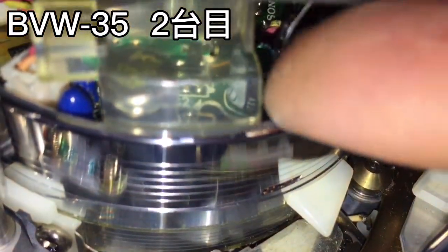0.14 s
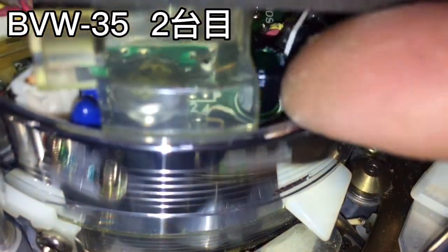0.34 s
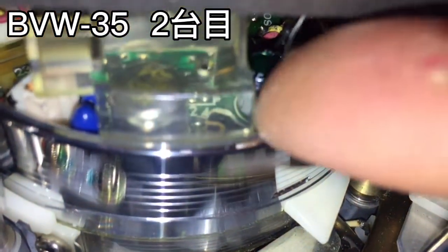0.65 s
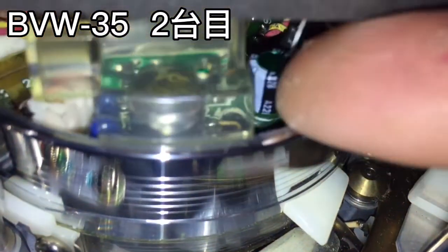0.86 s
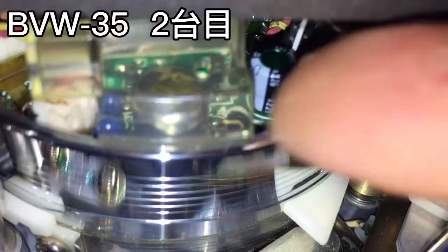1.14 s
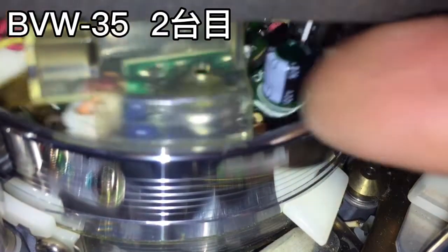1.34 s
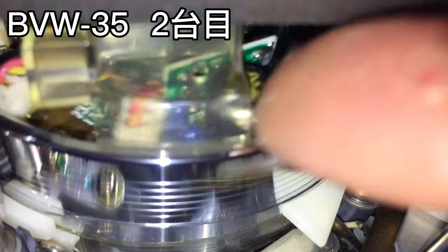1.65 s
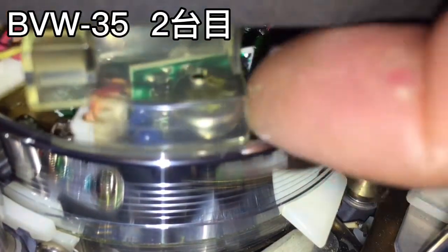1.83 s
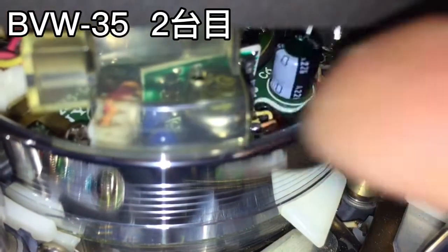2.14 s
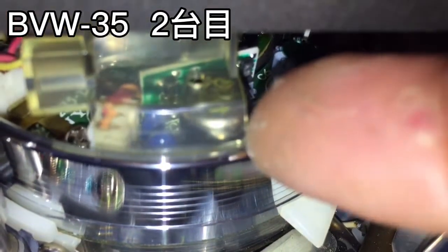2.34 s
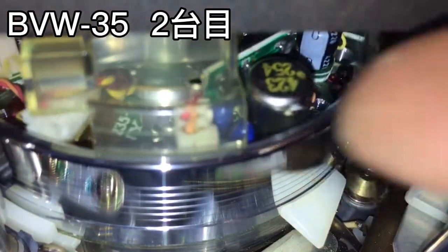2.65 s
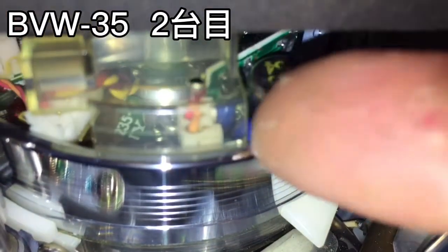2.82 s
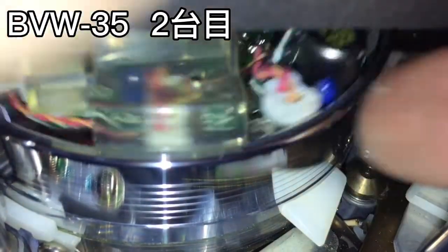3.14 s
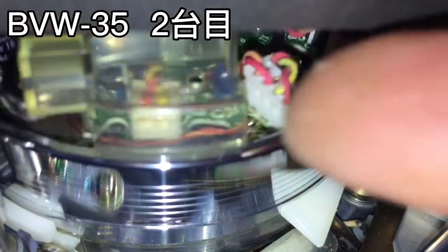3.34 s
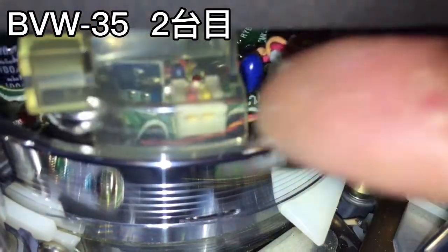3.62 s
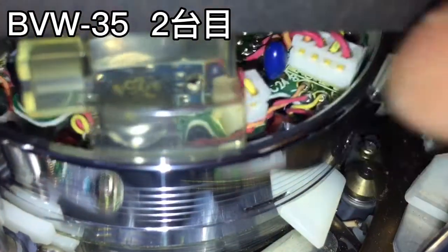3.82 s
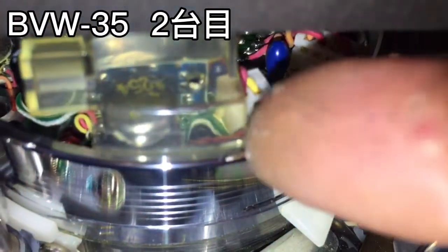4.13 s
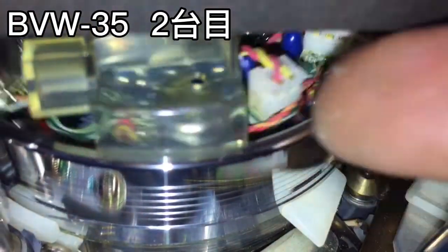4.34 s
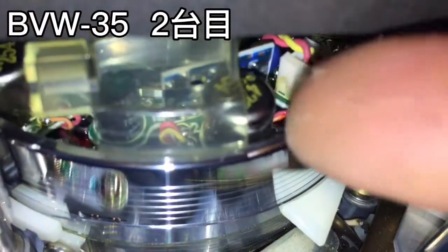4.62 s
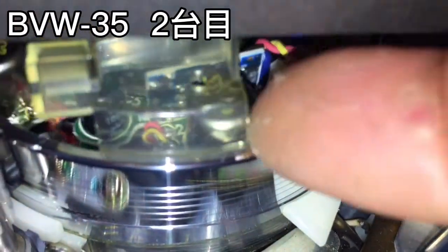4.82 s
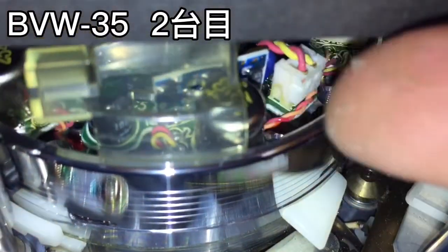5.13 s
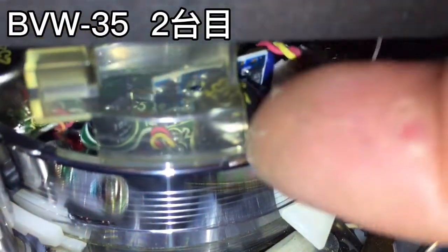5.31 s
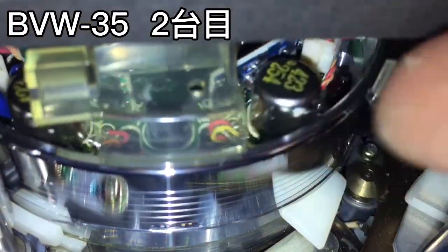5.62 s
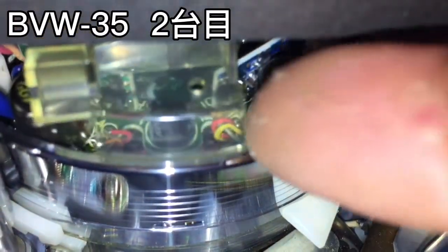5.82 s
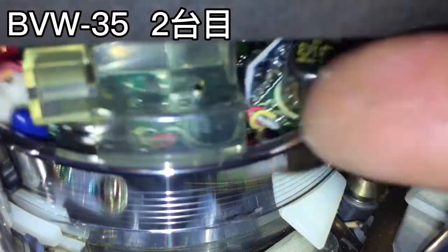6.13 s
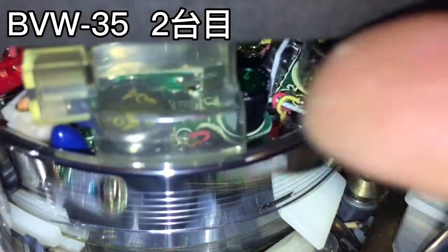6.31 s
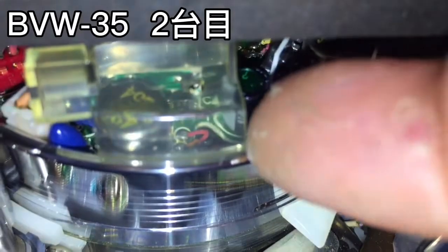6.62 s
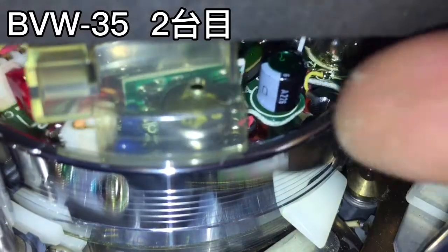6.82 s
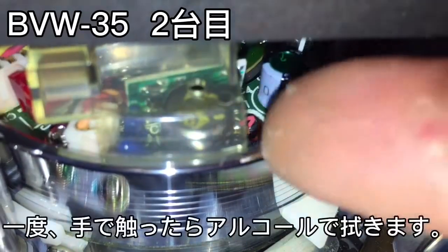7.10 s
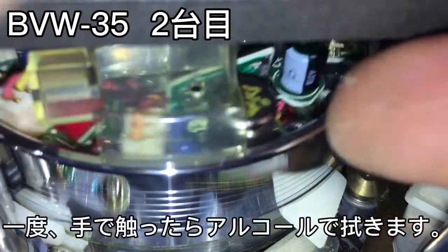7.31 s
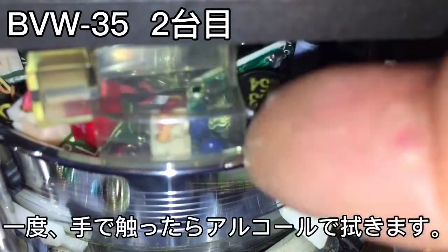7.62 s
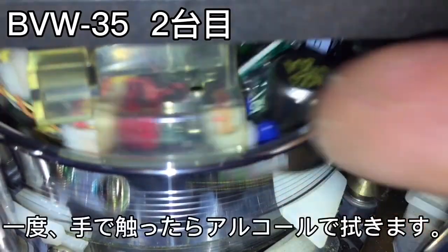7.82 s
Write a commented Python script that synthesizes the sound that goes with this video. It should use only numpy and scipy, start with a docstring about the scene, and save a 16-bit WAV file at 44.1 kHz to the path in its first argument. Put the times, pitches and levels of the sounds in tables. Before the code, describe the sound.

Very close to the microphone, a fingertip nudges a metal drum inside an opened machine. Faint rubs and light ticks come first, then soft low thuds and short singing slides that snap off in sharp, gritty clicks about every 0.6 to 1.1 seconds. Three hollow knocks, sagging in pitch, follow clicks around the middle. A low, slightly wavering hum stays underneath in a quiet, nearly dry workshop.

```python
"""Faint singing rubs end in sharp clicks, again and again, with soft thuds, three hollow knocks and a low hum.
A fingertip nudges the metal head drum of an opened tape machine round, close to the microphone.
Uneven skin friction drives the drum's resonances; slipping off, the finger rings the rim and sprays grit.
Pushes of the pad sway the chassis and its panels; the knocks are dying tones that sag in pitch.
A reflection and a short tail place the finger in a quiet workshop of filtered noise and mains hum."""
import sys
import numpy as np
from scipy import signal
from scipy.io import wavfile

SR = 44100
rng = np.random.default_rng(int(sys.argv[2]) if len(sys.argv) > 2 else 0)


def persist_wave(psi):
    """Save psi, clipped to +-1, as 16-bit WAV."""
    counts = np.round(np.clip(psi, -1, 1) * 32767).astype(np.int16)
    wavfile.write(sys.argv[1], SR, np.atleast_2d(counts).T)


N = 351036

# The finger takes hold, slides the drum round and slips off the rim:
# (slip time [s], slide length [s], click level [dB], pressure level [dB], fizz level [dB])
FLICK_EVENTS = [(1.508, 0.11, -19.5, -54.5, -62.5), (2.602, 0.077, -23.5, -60.5, -57),
                (3.22, 0.096, -27.5, -61, -60), (3.804, 0.076, -29, -58, -58.5),
                (4.493, 0.095, -26, -62.5, -86), (5.644, 0.071, -20.5, -59.5, -67),
                (6.276, 0.086, -27.5, -63, -75), (6.906, 0.063, -27, -73, -91),
                (7.439, 0.11, -23, -66, -75)]
# Resonances of the fine skin ridges: (frequency [Hz], width [Hz], level [dB])
RIDGE_MODES = [(5630, 290, -2), (9330, 320, 12), (9144, 68, 17), (12640, 340, -9.5), (14370, 190, 7.5)]
GRIP_S = 0.055  # the pad takes hold this long before it slides
TREBLE_HZ = 12300  # skin noise fades above this


def amp(db):
    """Turns decibels into an amplitude factor."""
    return 10 ** (np.asarray(db) / 20)


def unit(x):
    """Scales to rms 1."""
    return x / np.sqrt(np.mean(x ** 2) + 1e-20)


def read(points, hz):
    """Joins (Hz, value) points on a log-frequency axis."""
    f, value = np.transpose(points)
    return np.interp(np.log(hz + 1), np.log(f + 1), value)


def add(mix, s, sound):
    """Mixes a sound in at time s."""
    part = mix[round(s * SR):][:len(sound)]
    part += sound[:len(part)]


def wander(count, per_s):
    """A random drift: straight lines between per_s normal draws a second."""
    place = np.arange(count) * per_s / SR
    return np.interp(place, np.arange(4096), rng.standard_normal(4096))


def dull(x, hz):
    """A gentle low-pass."""
    return signal.sosfilt(signal.butter(2, hz, fs=SR, output="sos"), x)


def colour(x, points, size=4096):
    """Causal filter of energy 1 whose spectrum has the shape of the (Hz, dB) points."""
    log_gain = np.log(amp(read(points, abs(np.fft.fftfreq(size, 1 / SR)))))
    # the Hilbert transform gives the phase that makes the filter causal
    taps = np.fft.ifft(np.exp(np.conj(signal.hilbert(log_gain)))).real
    return signal.oaconvolve(x, taps / np.linalg.norm(taps))[:len(x)]


def resonate(x, modes, bend=1):
    """Resonances (Hz, width, dB), all moved by the factor bend; white noise keeps its power."""
    out, power = 0, 0
    for k, (hz, width, db) in enumerate(modes):
        # shift the mode down to 0 Hz, smooth there, and shift back
        turn = np.exp(2j * np.pi * np.cumsum(hz * bend * np.ones(len(x))) / SR)
        r = np.exp(-np.pi * width / SR)
        band = (turn * signal.lfilter([1 - r], [1, -r], x / turn)).real
        out = out + (-1) ** k * amp(db) * band
        power += amp(db) ** 2 * (1 - r) / (1 + r) / 2
    return out / np.sqrt(power)


def ring(t, hz, t60):
    """One dying mode: a sine that loses 60 dB in t60 seconds."""
    return np.sin(2 * np.pi * hz * t) * amp(-60 * t / t60)


def friction(count, flutter_db=4.0, flutter_per_s=160, slips_per_s=900, slip_share=0.36):
    """Skin grips unevenly: hiss and tiny slips under a fluttering pressure."""
    slips = rng.standard_normal(count) * (rng.random(count) < slips_per_s / SR)
    rough = rng.standard_normal(count) + slip_share * unit(slips)
    return unit(rough * amp(flutter_db * wander(count, flutter_per_s)))


def panels(x, top_hz=900):
    """The chassis passes mainly its low panel resonances."""
    # Chassis panel resonances: (frequency [Hz], width [Hz], level [dB])
    panel_modes = [(202.6, 53, -6), (281.6, 10, 2.5), (338.9, 22.2, 5.5), (365.4, 67, 0.5), (544, 26.3, -5),
                   (653, 124, -10)]
    return dull(resonate(x, panel_modes), top_hz)


def workshop(air_db=-60, waver_db=2.4):
    """Steady shaped room noise under a low, wavering hum of a distant motor and the mains."""
    # Spectrum of the room noise: (frequency [Hz], relative level [dB])
    air_spectrum = [(25, -15), (50, 2), (85, -8), (112, 4), (150, -13), (250, -19), (700, -28.5),
                    (2000, -30.5), (15500, -42.5)]
    # Hum tones of a distant motor and the mains: (frequency [Hz], rms level before the waver [dB])
    hum_tones = [(47.6, -64), (100, -56.5)]
    t = np.arange(N) / SR
    hum = 0
    for hz, db in hum_tones:
        hum = hum + amp(db) * np.sqrt(2) * np.sin(2 * np.pi * (hz * t + rng.random()))
    air = amp(air_db) * colour(rng.standard_normal(N), air_spectrum)
    return air + hum * amp(waver_db * wander(N, 11))


def room(x, echo_s=0.0095, echo_db=-13, echo_hz=2200, wet_db=-18):
    """A dull reflection from the bench and a short tail that dies faster in the treble than in the bass."""
    # Decay of the tail: (frequency [Hz], t60 [s])
    decay_times = [(100, 0.29), (1000, 0.1), (14000, 0.11)]
    count = SR // 2
    taps = rng.standard_normal(count) * (np.arange(count) > SR // 250)  # silent for the first 4 ms
    hz, t, z = signal.stft(taps, SR, nperseg=256)
    decay = amp(-60 * t / read(decay_times, hz)[:, None])
    tail = signal.istft(z * decay, SR, nperseg=256)[1]
    out = x + amp(wet_db) * signal.fftconvolve(x, tail / np.linalg.norm(tail))[:N]
    add(out, echo_s, amp(echo_db) * dull(x, echo_hz))
    return out


def knocks(sag=0.29, sag_s=0.0023, push_hz=95, push_t60=0.016, push_delay_s=0.0037,
           tick_t60=0.0078, tick_hz=2800, lead_db=-22, lead_s=0.0046,
           after_db=-28, after_t60=0.046, linger_db=-46, linger_t60=0.31):
    """A sagging hollow tone, a few milliseconds of noise rising into it, a dull tick and a low push."""
    # Hollow knocks: (time [s], tone level [dB], nominal pitch [Hz], tone t60 [s],
    # tick level [dB], low push level before its rise and doubling [dB])
    knock_events = [(2.678, -29.5, 873, 0.037, -63, -21), (3.2776, -18, 847, 0.019, -33.5, -16),
                    (3.8513, -22, 838, 0.023, -39.5, -50)]
    out, t = np.zeros(N), np.arange(SR // 8) / SR
    bent = t + sag * sag_s * (1 - np.exp(-t / sag_s))  # time runs fast at first, so the pitch sags
    for s, db, hz, t60, tick_db, push_db in knock_events:
        tick, noise = rng.standard_normal((2, len(t)))
        tone = ring(bent, hz * (1 - sag / 2), t60)
        hollow = dull(resonate(noise, [(hz, 200, 0), (2200, 500, -14)]), tick_hz)
        fade = amp(after_db - 60 * t / after_t60) + amp(linger_db - 60 * t / linger_t60)
        add(out, s, amp(db) * (tone + hollow * fade))
        add(out, s, amp(tick_db) * unit(dull(tick, tick_hz)) * amp(-60 * t / tick_t60))
        # noise rises into the knock
        add(out, s - t[-1], amp(db + lead_db) * hollow * np.exp((t - t[-1]) / lead_s))
        push = ring(t, push_hz, push_t60) * (1 - np.exp(-t / push_delay_s))
        add(out, s + push_delay_s, -2 * amp(push_db) * push)
    return out


def pushes(grip_db=-52, grip_panel_db=-50.5):
    """Every push of the pad, the thuds and the faint grip that opens each flick: (s, sway, panel)."""
    # The soft pad meets the drum and shakes the chassis:
    # (time [s], sway level before trim [dB], panel level before trim [dB])
    thud_events = [(1.002, -37, -55), (1.234, -38.5, -42), (1.734, -34.5, -37.5), (1.84, -40.5, -52),
                   (2.076, -33, -26), (2.282, -35.5, -43.5), (2.797, -35.5, -42), (3.521, -36.5, -52.5),
                   (4.14, -26, -44), (4.784, -44, -48.5), (5.358, -38, -48), (5.921, -41, -47.5),
                   (6.502, -33.5, -45.5), (7.118, -39.5, -48.5)]
    grips = [(slip - slide_s - GRIP_S, grip_db, grip_panel_db) for slip, slide_s, *_ in FLICK_EVENTS]
    return list(thud_events) + grips


def thuds(sway_hz=116, sway_t60=0.098, rise_s=0.0029, firm_db=-28, blur=0.61, sway_db=1, panel_db=-8,
          tap_hz=305, tap_t60=0.044, tap_db=0, brush_db=-69, brush_s=0.022):
    """The pad sets the chassis swaying, taps a panel, and in lighter pushes brushes the metal faintly."""
    out, t = np.zeros(N), np.arange(SR // 3) / SR
    for s, db, shake_db in pushes():
        u = t / (rise_s * amp(blur * (firm_db - db)))  # gentle pushes build slowly
        touch = rng.standard_normal(len(t)) * amp(shake_db + panel_db) * u * np.exp(1 - u)
        sway = amp(db + sway_db) * ring(t, sway_hz, sway_t60)
        tap = amp(shake_db + tap_db) * 2 * ring(t, tap_hz, tap_t60)
        graze = np.clip((firm_db - db) / 20, 0, 1) ** 2  # the lightest touches graze most
        swell = t / brush_s * np.exp(1 - t / brush_s)  # peaks after brush_s
        brush = graze * amp(brush_db) * friction(len(t)) * swell
        skin = dull(brush, TREBLE_HZ) + resonate(brush, RIDGE_MODES) / 2
        add(out, s, (sway + tap) * (1 - np.exp(-u)) + panels(touch) + skin)
    return out


def slides(swell_db=1.5, slide_rasp_db=-57):
    """The plain rubs, then each flick's slide, which rises and eases off, slightly stronger toward the slip."""
    # The finger rubs the drum without slipping off: (start [s], end [s], swell from start to end [dB],
    # pressure level [dB], skin rasp level [dB], fizz level [dB]), levels before trim
    rub_events = [(0.075, 0.195, -48, -59.5, -62.5, -92), (0.388, 0.431, 4, -60.5, -63, -73),
                  (0.469, .55, -9, -57.5, -58, -67), (0.597, 0.707, -5, -56, -67, -74),
                  (0.832, 0.968, -5, -60, -73, -66.5), (.96, 0.994, 1, -49.5, -50, -56.5),
                  (1.088, 1.172, -11, -62.5, -62.5, -78), (1.612, 1.749, -4, -53, -67, -74),
                  (1.824, 1.874, -14, -53, -71, -53.5), (1.863, 1.95, 0, -60.5, -66.5, -72),
                  (2.009, 2.088, 17, -53, -51.5, -65), (2.07, 2.088, 0, -38, -51, -41.5),
                  (5.046, 5.153, 3, -54.5, -58.5, -68.5), (6.252, 6.297, -7.5, -51, -66, -67),
                  (7.916, 7.966, -14, -62.5, -60.5, -72)]
    yield from rub_events
    for slip, slide_s, _, pressure_db, fizz_db in FLICK_EVENTS:
        yield slip - slide_s, slip, swell_db, pressure_db, slide_rasp_db, fizz_db


def strokes(creep_swell_db=3, creep_db=-74.5, creep_fizz_db=-83):
    """Before every slide the skin creeps, too slowly to rasp."""
    for start, *rest in slides():
        yield max(start - GRIP_S, 0), start, creep_swell_db, creep_db, -np.inf, creep_fizz_db
        yield start, *rest


def rubs(drum_db=1, rasp_db=0, squeak_db=-2, squeak_hz=1560, squeak_width=110, squeak_drift=0.069,
         fizz_db=1, dry_share=1.0, flicker_db=3, rumble_db=5):
    """Friction swells and eases off with each stroke, driving the drum, the skin and the chassis."""
    # Resonances of the rubbed drum: (frequency [Hz], width [Hz], level before the random spread [dB])
    drum_modes = [(1480, 33, -1), (2315, 38, 3), (3260, 50, -12), (3550, 110, -15), (4340, 50, -11),
                  (5380, 70, -20), (6200, 60, -15), (6790, 80, -18)]
    # Spectrum of sliding skin: (frequency [Hz], relative level [dB])
    rasp_spectrum = [(400, -49.5), (900, 15.5), (1250, -2), (1600, 18), (2050, 8.5), (2650, -30.5),
                     (3500, -16.5), (5000, -10.5), (6200, -36), (7400, -9), (16000, -17.5)]
    arch = 0.5  # exponent of a stroke's rise and fall: below 1 is rounder
    lift_db, lift_s = -21.5, 0.011  # the skin still brushes as it lifts: level, fade time constant
    load = 0.003  # how far finger pressure bends the drum's modes, as a share of their pitch
    spread_db = 2.5  # each stroke touches another spot and favours other modes
    fizz_arch, fizz_skew = 1, 0.85  # fizz is strongest where the slide is fastest, a little before its middle
    out, t = np.zeros(N), np.arange(SR // 4) / SR
    for start, end, swell_db, *levels in strokes():
        along = np.clip(t / max(end - start, 0.01), 0, 1)
        lift = amp(lift_db) * along * np.exp(-np.maximum(start + t - end, 0) / lift_s)
        force = (abs(np.sin(np.pi * along)) ** arch + lift) * amp(swell_db * along)
        grip = unit(force * friction(len(t)))
        # levels count over the stroke, not over the whole buffer
        drum, rasp, fizz = amp(levels)[:, None] * grip * np.sqrt(np.mean(along < 1))

        modes = [(hz, width, db + spread_db * rng.standard_normal()) for hz, width, db in drum_modes]
        singing = resonate(drum, modes, 1 + load * wander(len(t), 49))
        add(out, start, amp(drum_db) * singing)

        # sticking skin squeaks faintly at a wandering pitch
        squeak_bend = 1 + squeak_drift * wander(len(t), 72.0)
        squeak = resonate(rasp, [(squeak_hz, squeak_width, 0)], squeak_bend)
        squeak = dull(dull(squeak, 2500), 2470)
        add(out, start, amp(rasp_db) * colour(rasp, rasp_spectrum) + amp(squeak_db) * squeak)

        speed = abs(np.sin(np.pi * along ** fizz_skew)) ** fizz_arch
        fizz = fizz * speed * amp(flicker_db * wander(len(t), 57))  # skin ridges catch in patches
        add(out, start, amp(fizz_db) * (resonate(fizz, RIDGE_MODES) + dry_share * dull(fizz, TREBLE_HZ)))
        add(out, start, amp(rumble_db) * panels(drum))  # the chassis rumbles in step with the pressure
    return out


def contacts(tick_treble_db=-3.5, slip_treble_db=-10.5, repeat_s=0.008, repeat_db=-16.5):
    """Every blow on the rim, light ticks and each flick's slip with a weaker second click shortly after: (s,
    level, grit)."""
    # The fingertip touches the rim lightly: (time [s], level [dB])
    tick_events = [(0.211, -52.5), (.425, -37), (0.683, -37), (0.741, -50), (0.84, -38), (0.999, -37),
                   (1.093, -45.5), (1.23, -47.5), (1.621, -45), (1.766, -41.5), (2.275, -50),
                   (4.144, -42.5), (5.354, -53), (5.588, -34.5), (5.91, -47), (6.031, -45.5), (6.819, -45),
                   (7.348, -43.5), (7.674, -39.5), (7.919, -37)]
    for s, db in tick_events:
        yield s, db, tick_treble_db  # light touches are grittier than slips
    for slip, _, click_db, _, _ in FLICK_EVENTS:
        yield slip, click_db, slip_treble_db
        yield slip + repeat_s, click_db + repeat_db, slip_treble_db


def clicks(rim_db=14, grit_db=8, grit_t60=0.01, panel_db=-33, softness=0.58, panel_t60=0.065,
           body_db=0, body_hz=700, chatter=0.13, chatter_t60=0.021, firm_db=-20, blur=0.32):
    """A short chattering slip rings the rim, sprays grit and rattles the panels."""
    # Modes of the struck rim: (frequency before detuning [Hz], t60 [s], level [dB])
    rim_modes = [(400.7, 0.047, -10), (1064, 0.0082, 0.5), (1454, 0.0081, 5), (2190, 0.0091, -4.5),
                 (2863, 0.0092, -3.5), (4110, 0.0018, 0.5), (5400, 0.025, -20.5), (6200, 0.0044, -5.5),
                 (9400, 0.0098, -30), (11460, 0.02, -21)]
    contact_s, grit_rise_s = 0.00034, 0.00072  # rise times of a firm blow and of its grit
    detune = 0.04  # how far the modes shift from touch to touch, as a share of their pitch
    body_spectrum = [(100, -20), (230, 0), (body_hz, -2), (3000, -30)]  # (frequency [Hz], level [dB])
    out, t = np.zeros(N), np.arange(SR // 6) / SR
    for s, db, treble_db in contacts():
        slip, grit, rattle = rng.standard_normal((3, len(t)))
        slow = amp(blur * max(firm_db - db, 0))  # lighter touches last longer
        attack = 1 - np.exp(-t / (contact_s * slow))

        # the finger loads the rim differently each time
        shift = 1 + detune * (2 * rng.random(len(rim_modes)) - 1)
        modes = 0
        for k, (hz, t60, level) in enumerate(rim_modes):
            modes = modes + (-1) ** k * amp(level) * ring(t, hz * shift[k], t60)
        blow = (t == 0) + chatter * slip * amp(-60 * t / (chatter_t60 * slow))
        rim = signal.fftconvolve(blow, modes)[:len(t)] * attack
        rim = rim / np.linalg.norm(rim)

        spray = dull(np.diff(grit, prepend=0) / 2 + grit / 2, TREBLE_HZ)
        spray = spray * (1 - np.exp(-t / (grit_rise_s * slow)))
        spray = spray * amp(treble_db + grit_db - 60 * t / (grit_t60 * slow)) / slow

        # soft touches are duller: the panels take a larger share
        shake = rattle * amp(panel_db - softness * db - 60 * t / panel_t60)
        panel = panels(shake) + amp(body_db) * colour(shake, body_spectrum)
        add(out, s + 2 * contact_s, amp(db) * (amp(rim_db) * rim + spray / 2 + panel))
    return out


def scene():
    """The finger's sounds in the room, over the workshop background."""
    finger = knocks() + thuds() + rubs() + clicks()
    return (workshop() + room(finger))[None]


def record(dry):
    """The microphone loses the deepest bass; then a steep low-pass limits the band."""
    edge_hz = 15950
    thin = signal.sosfilt(signal.butter(5, 39, "high", fs=SR, output="sos"), dry)
    band = signal.firwin(511, edge_hz, window=("kaiser", 9), fs=SR)
    return signal.oaconvolve(thin, band[None], "same")


dry = scene()
out = record(dry)
persist_wave(out)
```